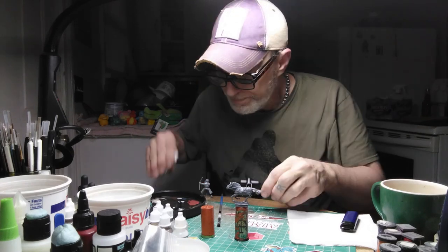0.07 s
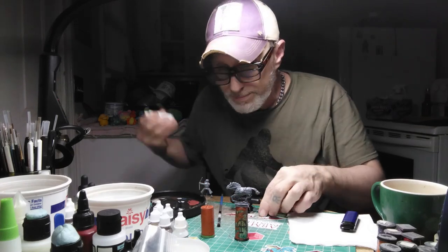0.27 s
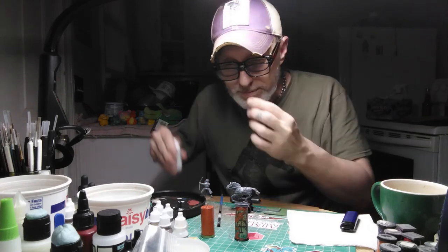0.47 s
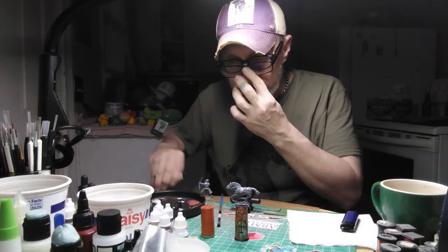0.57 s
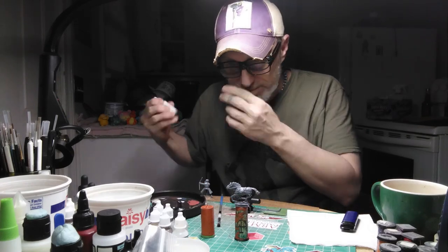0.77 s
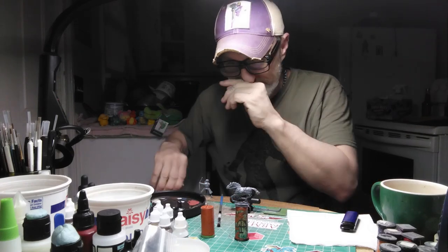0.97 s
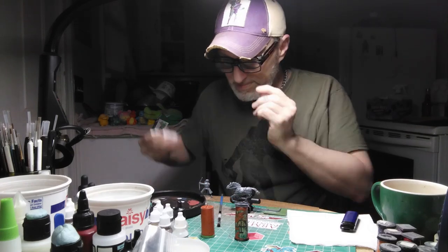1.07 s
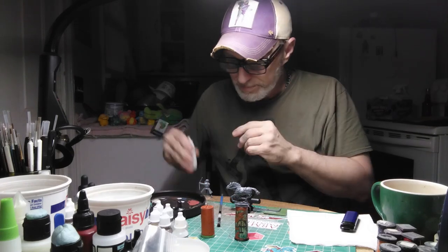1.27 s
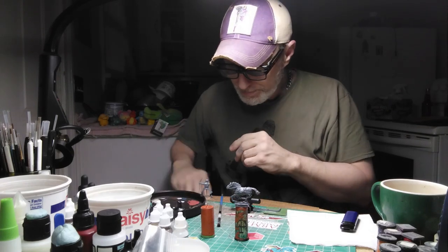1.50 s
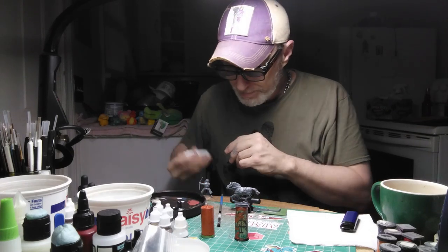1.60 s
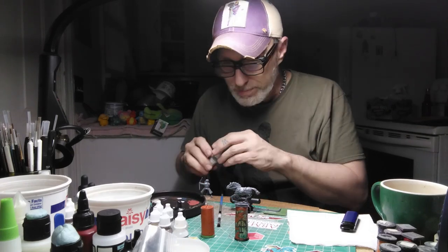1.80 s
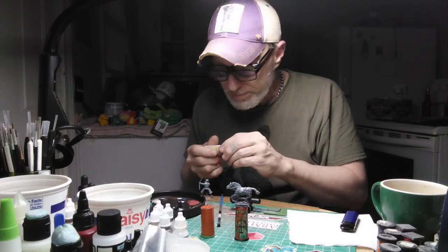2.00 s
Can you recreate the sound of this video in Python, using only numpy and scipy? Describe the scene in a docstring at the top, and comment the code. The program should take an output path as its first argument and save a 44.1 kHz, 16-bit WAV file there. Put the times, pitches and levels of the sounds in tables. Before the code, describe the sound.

Rapid hollow plastic rattling of a ball in a dropper bottle of paint, about eight strokes a second, with an early desk scrape and rumble, then softer last taps; close, fairly dry small room.

```python
"""A small plastic dropper bottle of paint is shaken about eight strokes a second at a desk in a small room.
Its mixing ball makes the wall ring and crack as it taps, slams into the end and rebounds.
The paint churns round the ball as swelling bursts of tiny pops.
Early on something is set down and skids on the desk with rough squeaks, over a low shudder of wavering
tones and rumble that dies away and comes back softly as the hand comes to rest."""
import sys
import numpy as np
from scipy import signal
from scipy.fft import rfft, irfft
from scipy.io import wavfile
from scipy.ndimage import uniform_filter1d, minimum_filter1d

SR = 44100
rng = np.random.default_rng(int(sys.argv[2]) if len(sys.argv) > 2 else 0)


def int16_out(signal):
    """Quantize to a 16-bit WAV file."""
    q = np.round(np.clip(np.atleast_2d(signal).T, -1, 1) * 32767)
    wavfile.write(sys.argv[1], SR, q.astype(np.int16))


N = 90404


def undb(db):
    """Turn decibels into a gain."""
    return 10 ** (np.asarray(db) / 20)


def unit(x):
    """Scale to an average (rms) level of 1."""
    return x / np.sqrt(np.mean(x ** 2))


def colour(x, points):
    """Filter through (frequency [Hz], level [dB]) points, keeping the power of white noise and no pre-echo."""
    size = 4096
    hz, db = np.array(points).T
    bin_hz = np.arange(size // 2 + 1) * SR / size
    gain = unit(undb(np.interp(np.log(bin_hz + 1), np.log(hz), db)))
    # Folding the cepstrum forward makes the filter answer as early as it can
    cepstrum = irfft(np.log(gain))
    cepstrum[1:size // 2] *= 2
    cepstrum[size // 2 + 1:] = 0
    response = irfft(np.exp(rfft(cepstrum)))
    return signal.fftconvolve(x, response)[:len(x)]


def walk(rate):
    """Make a smooth random wander with a spread near 1, drawing `rate` new values a second."""
    hold = max(int(SR / rate), 1)
    steps = np.repeat(rng.standard_normal(N // hold + 1), hold)
    return unit(uniform_filter1d(steps, hold)[:N])


def add(out, at, sound):
    """Mix a sound in at a time in seconds."""
    i = max(int(at * SR), 0)
    out[i:i + len(sound)] += sound[:N - i]


def grains(rate):
    """Tiny clicks at random moments, about `rate` a second, with an rms of 1."""
    return unit((rng.random(N) < rate / SR) * rng.standard_normal(N))


def faint_floor():
    """A faint steady noise, strongest in the bass, lies under everything."""
    # Tone of the background noise: (frequency [Hz], level [dB])
    floor_tone = [(25, 0), (70, -16), (300, -33), (15000, -56)]
    level_db = -54
    return undb(level_db) * unit(colour(rng.standard_normal(N), floor_tone))


def shudder(t):
    """A wavering low buzz that pulses against a slow sway, with a little rumble riding on it."""
    # Strength of the shudder over time: (time [s], level [dB])
    strength = [(0, -27.5), (.12, -35), (.16, -27), (.25, -21), (.38, -19.5), (.44, -24.5), (.48, -37.5),
                (.53, -85), (.62, -38), (.68, -61), (.88, -76), (.94, -53), (1.02, -71), (1.54, -61),
                (1.6, -43.5), (1.69, -69), (1.748, -35.5), (1.8, -78.5), (1.96, -61)]
    # Buzz partials from the lowest up: (level [dB])
    partials_db = [0, -7, -15.5, -23]
    # Tone of the rumble: (frequency [Hz], level [dB])
    rumble_tone = [(70, 0), (350, -22), (950, -29), (2500, -62)]
    buzz_hz, step_hz = 94.73, 77.4  # lowest partial, spacing of the partials
    sway_db, rumble_db = -0.5, -9  # relative to the strength of the shudder
    clock = t + np.cumsum(.04 * walk(45)) / SR  # uneven time makes the pitch waver
    buzz = 0
    for k, db in enumerate(partials_db):
        buzz = buzz + undb(db) * np.cos(2 * np.pi * (buzz_hz + k * step_hz) * clock)
    sway = undb(sway_db) * np.cos(2 * np.pi * (buzz_hz - step_hz) * clock)
    rumble = undb(rumble_db) * colour(rng.standard_normal(N), rumble_tone)
    level_db = np.interp(t, *np.array(strength).T) + 2 * walk(90)
    return (buzz - sway + rumble) * undb(level_db)


def skids(t):
    """Short rough squeaks of an object that sticks and slips on the desk."""
    # Squeaks: (time of the crest [s], half length [s], pitch [Hz], level [dB])
    squeaks = [(0.255, 0.0022, 888, -18.5), (0.286, 0.0053, 1050, -18.5), (0.339, 0.007, 1030, -19.5),
               (0.352, 0.0045, 930, -4.5), (0.364, 0.0027, 900, -9), (0.367, 0.0031, 710, -6.5),
               (0.425, 0.011, 1020, -20.5)]
    # Tone of the scraping noise: (frequency [Hz], level [dB])
    rasp_tone = [(450, -24), (800, -10), (1300, 8), (2400, -7), (5000, -15.5), (9800, -10.5), (11800, -39)]
    pitch_wander, rough_db = 0.0579, 3.5  # spread as a share of the pitch, spread of the level
    rasp_db, slips_per_s = -11.5, 900
    wander = np.cumsum(pitch_wander * walk(1000)) / SR
    tone, grip = 0, 0
    for at, half, hz, db in squeaks:
        swell = undb(db) * np.exp(-.5 * ((t - at) / half) ** 2)
        tone = tone + swell * np.sin(2 * np.pi * hz * (t + wander))
        grip = grip + swell
    rough_tone = tone * undb(rough_db * walk(700))
    rasp = undb(rasp_db) * colour(grip * grains(slips_per_s), rasp_tone)
    return rough_tone + rasp


def paint(t):
    """Dense tiny pops swell and fade as the paint reaches the end of the bottle."""
    # Paint thrown at each stroke: (time of the crest [s], level [dB])
    sloshes = [(0.193, -26), (0.31, -33), (0.445, -31.5), (0.569, -30.5), (0.69, -26.5), (0.821, -23.5),
               (0.963, -27.5), (1.084, -26), (1.223, -28.5), (1.362, -20), (1.481, -24), (1.61, -26.5),
               (1.755, -35.5)]
    # Tone of the pops: (frequency [Hz], level [dB])
    slosh_tone = [(400, -15.5), (1200, -7.5), (2100, 2.5), (5300, -12), (9000, -15), (15000, -27)]
    rise_s, fall_s, pops_per_s = 0.016, 0.018, 2900
    flow = 0
    for at, db in sloshes:
        fading = np.where(t < at, ((at - t) / rise_s) ** 2, (t - at) / fall_s)
        flow = flow + undb(db) * np.exp(-fading)
    return colour(flow * grains(pops_per_s), slosh_tone)


def ring(t, hz, rise):
    """A heavily damped vibration that swells to 1 in `rise` seconds and dies."""
    return (t / rise * np.exp(1 - t / rise)) ** 2 * np.sin(2 * np.pi * hz * t)


def ball():
    """Each contact rings the damped wall; soft ones are rounder, hard ones chatter in a bright crack.

    Where the ball lands sets the pitch of the ring."""
    # Ball contacts: (time [s], level of the ring before shaping [dB],
    # level of the crack before shaping [dB], base pitch of the ring [Hz])
    contacts = [(0.1611, -14.5, -41.5, 2000), (.1905, -9, -20, 2067), (.288, -16.5, -34, 2030),
                (0.296, -10, -27, 2010), (.3058, 0, -9, 2074), (0.310, 4, -10.5, 2084),
                (0.3215, -11, -25, 1930), (0.35, -18, -24, 1700), (0.365, -23.5, -15.5, 1520),
                (0.44, -14, -17, 2020), (0.557, -16, -22.5, 2130), (0.5646, -12, -13.5, 2110),
                (.573, -12, -41, 2125), (0.668, -18.5, -42, 2130), (0.6819, -6, -13, 2400),
                (0.6898, -21.5, -11, 2500), (.7054, -7.5, -26.5, 1980), (.786, -19.5, -40, 2300),
                (0.7958, -13.5, -41, 2080), (0.8055, -8, -21.5, 2190), (0.820, -11, -6.5, 1980),
                (0.8364, -7, -35.5, 2050), (.928, -22.5, -49, 2120), (0.97, -11, -26, 2130),
                (1.0476, -19.5, -50, 2170), (1.067, -17, -22, 2180), (1.0763, -5.5, -14, 2480),
                (1.0944, -7, -22.5, 2090), (1.147, -25, -38, 2080), (1.2172, -9, -12, 1930),
                (1.228, -13.5, -26.5, 2055), (1.3521, -13.5, -24.5, 2274), (1.370, -10, -28, 2270),
                (1.470, -10, -15, 2190), (1.474, -6.5, -25.5, 2205), (1.587, -19, -38, 2050),
                (1.5963, -9, -24.5, 2100), (1.630, -19, -35, 1760), (1.7258, -24.5, -44, 1960),
                (1.7425, -9, -25.5, 2250), (1.7473, -11, -15, 2120), (1.7494, -3.5, -17, 2100),
                (1.8086, -35.5, -32.5, 2200), (1.8162, -16, -53, 2110), (1.855, -32, -48, 2200),
                (1.88, -52, -47.5, 2630)]
    # Ways the bottle wall vibrates: (multiple of the base pitch [ratio], level [dB])
    wall_modes = [(.65, -13.5), (1, -1), (1.24, -15), (1.89, -4)]
    # Tone of the hard crack: (frequency [Hz], level [dB])
    crack_tone = [(150, -6), (450, -25), (900, -10.5), (4000, 3.5), (5200, -7), (6700, -2), (8000, -8.5),
                  (14000, -12.5), (16000, -41)]
    wall_rise_s, pitch_scatter, level_scatter_db = 0.00056, 0.038, 2  # level scatter is per octave up
    # For each dB that the crack lies under the ring: loss [dB per octave], share of longer push
    soft_tilt_db, soft_stretch = 0.43, 0.038
    crack_rise_s, crack_scatter = 0.0015, 0.07  # typical rise, its random spread
    t = np.arange(SR // 20) / SR
    wall, crack = np.zeros(N), np.zeros(N)
    ratio, mode_db = np.array(wall_modes).T[:, :, None]
    octaves_up = np.maximum(np.log2(ratio), 0)
    for at, ring_db, crack_db, hz in contacts:
        softness_db = max(ring_db - crack_db, 0)
        detune, uneven = rng.standard_normal((2, *ratio.shape))
        mode_hz = hz * ratio * (1 + pitch_scatter * detune)
        modes = ring(t, mode_hz, wall_rise_s * (1 + soft_stretch * softness_db))
        tilt_db = (level_scatter_db * uneven - soft_tilt_db * softness_db) * octaves_up
        add(wall, at, np.sum(undb(ring_db + mode_db + tilt_db) * modes, axis=0))
        age = t / (crack_rise_s * np.exp(crack_scatter * rng.standard_normal()))
        chatter = rng.choice([-1, 1], len(t))
        add(crack, at, undb(crack_db) * chatter * age * np.exp(1 - age))
    return wall + colour(crack, crack_tone)


def room(x):
    """Quick reflections from the cluttered desk, then the room's short tail; both change as the bottle moves."""
    # Tone of the reflected sound: (frequency [Hz], level [dB])
    room_tone = [(150, -15.5), (700, -6), (2400, 1.5), (7000, -4.5), (11000, 0)]
    early_db, early_decay_s = -7, 0.0041
    tail_db, tail_t60_s = -16.5, 0.21  # t60 is the time to fade by 60 dB
    gap_s = 0.0028  # silence before the first reflection
    size = SR // 16  # samples between fresh echo patterns
    t = np.arange(SR // 3) / SR
    early_fade = np.exp(-t / early_decay_s)
    tail_fade = np.exp(-np.log(1000) * t / tail_t60_s)
    fades = np.array([early_fade, tail_fade]) * (t > gap_s)
    out = np.zeros(N)
    for i in range(0, N, size):
        early, tail = rng.standard_normal(fades.shape) * fades
        echo = (undb(early_db) * unit(early) + undb(tail_db) * unit(tail)) / np.sqrt(len(t))
        add(out, i / SR, signal.fftconvolve(x[i:i + size], echo))
    return colour(out, room_tone)


def suppress(x):
    """Noise suppressor: narrow bands that sink under the threshold are faded out."""
    size, threshold_db = 256, -91  # samples per slice, level per band
    bands = signal.stft(x, nperseg=size)[2]
    power = uniform_filter1d(np.abs(bands) ** 2, size=3, axis=-2)  # average over neighbouring bands
    gain = power / (power + undb(threshold_db) ** 2)
    return signal.istft(bands * gain, nperseg=size)[1][:, :N]


def limit(x):
    """Fast peak limiter: turns the sound down smoothly round peaks above full scale."""
    size = SR // 500
    gain = minimum_filter1d(1 / np.maximum(np.abs(x), 1), size)
    return x * uniform_filter1d(gain, size)


def scene():
    """The bottle, too small to radiate bass, in the room; the desk noises; a faint floor."""
    t = np.arange(N) / SR
    floor = faint_floor()
    low_shudder = shudder(t)
    desk = skids(t)
    bass_cut = signal.butter(2, 680, "high", fs=SR, output="sos")  # Hz
    bottle = signal.sosfilt(bass_cut, ball() + paint(t))
    return (bottle + desk + room(bottle + desk / 2) + low_shudder + floor)[None]


def record(dry):
    """The recorder suppresses faint noise, limits the peaks and cuts the top."""
    top_cut = signal.ellip(10, .2, 80, 15700, fs=SR, output="sos")  # steep, above 15700 Hz
    return signal.sosfilt(top_cut, limit(suppress(dry)))


dry = scene()
out = record(dry)
int16_out(out)
```